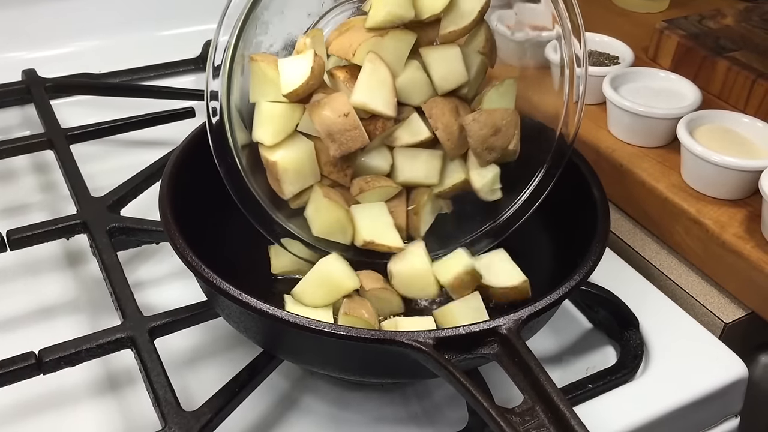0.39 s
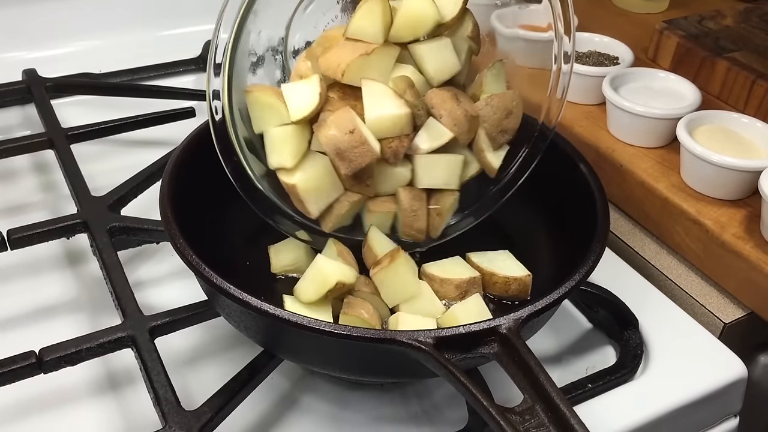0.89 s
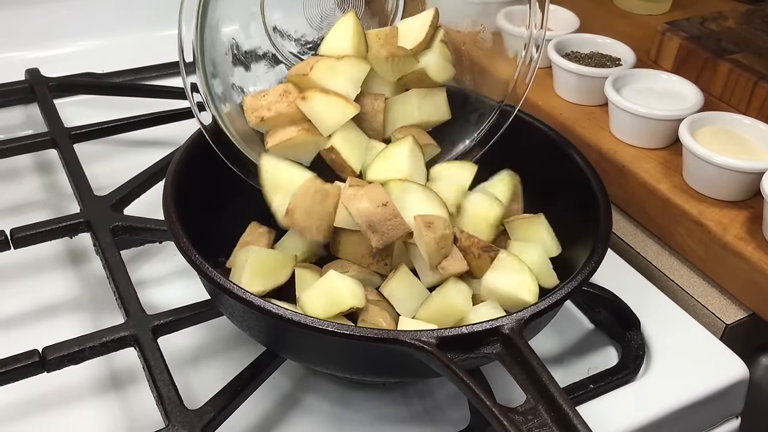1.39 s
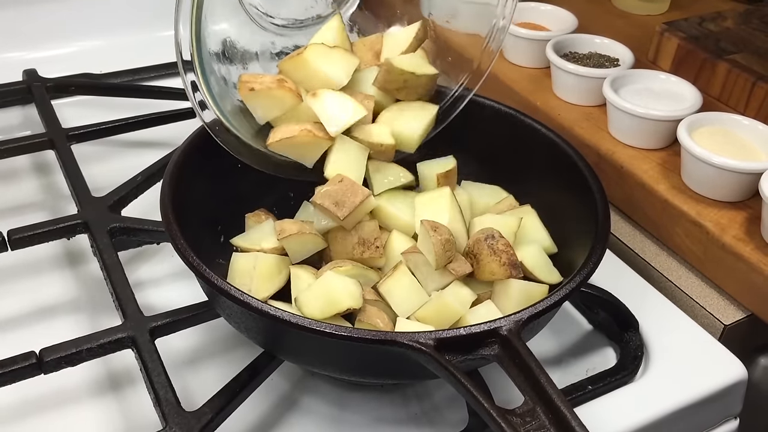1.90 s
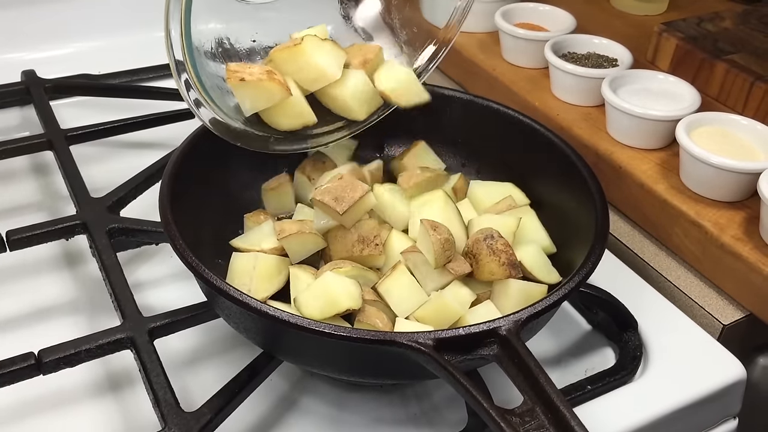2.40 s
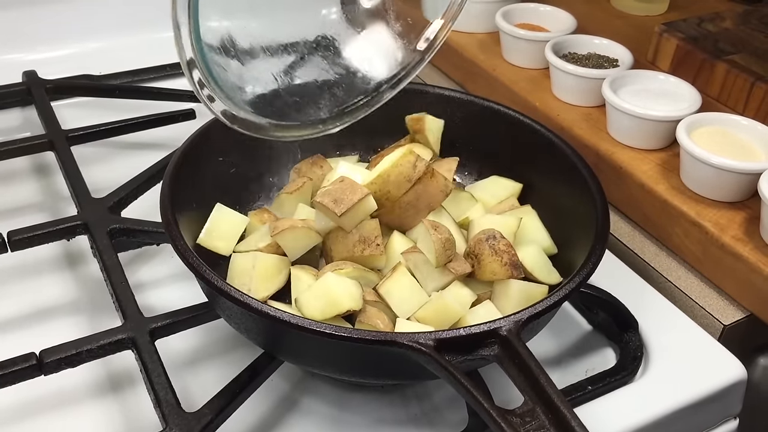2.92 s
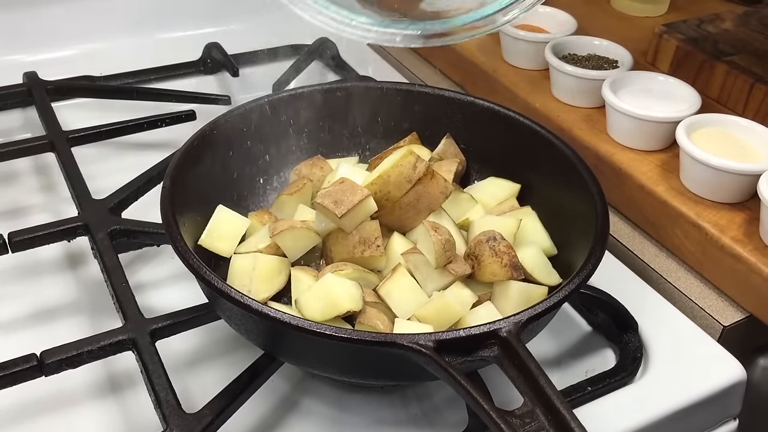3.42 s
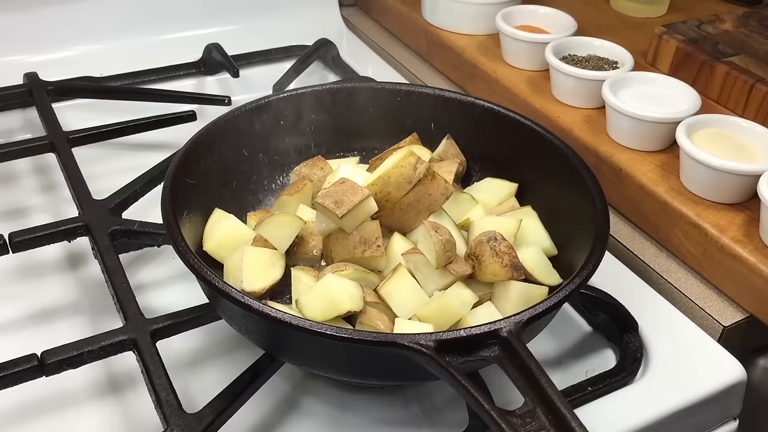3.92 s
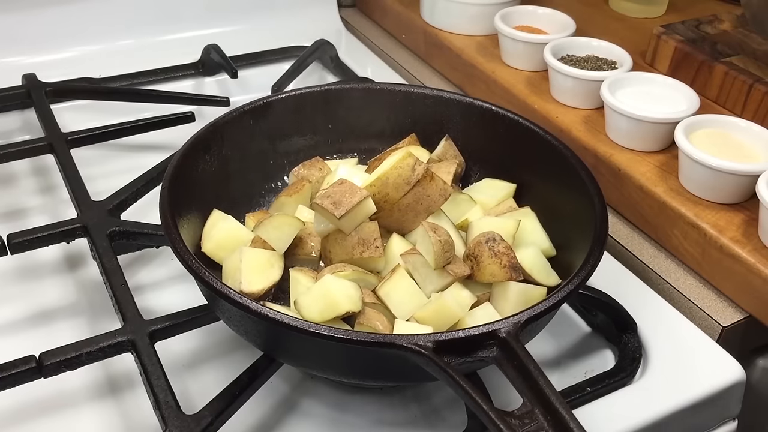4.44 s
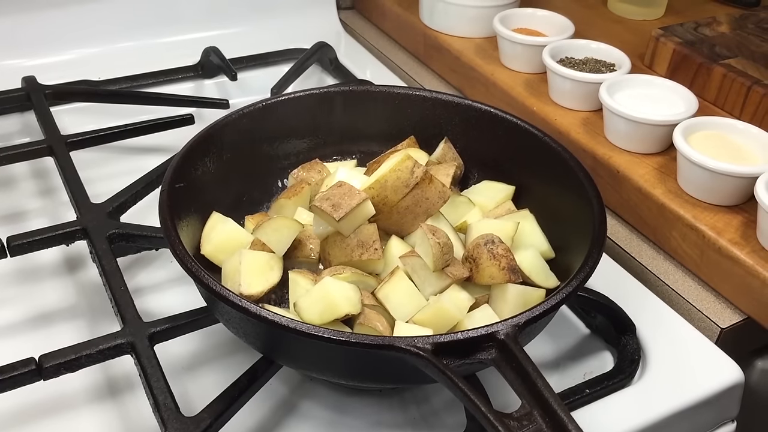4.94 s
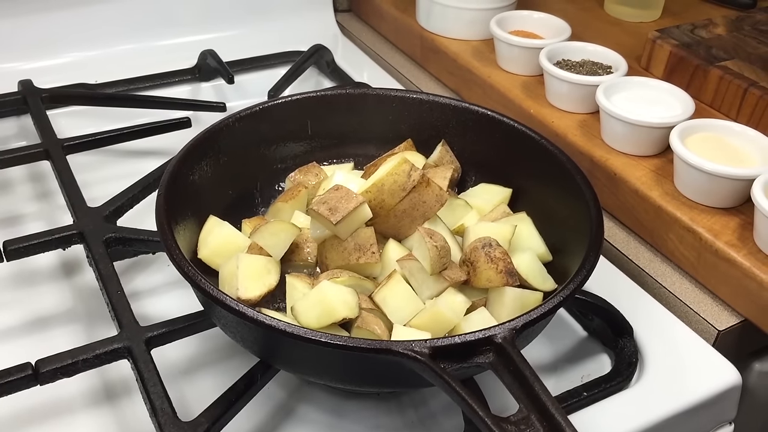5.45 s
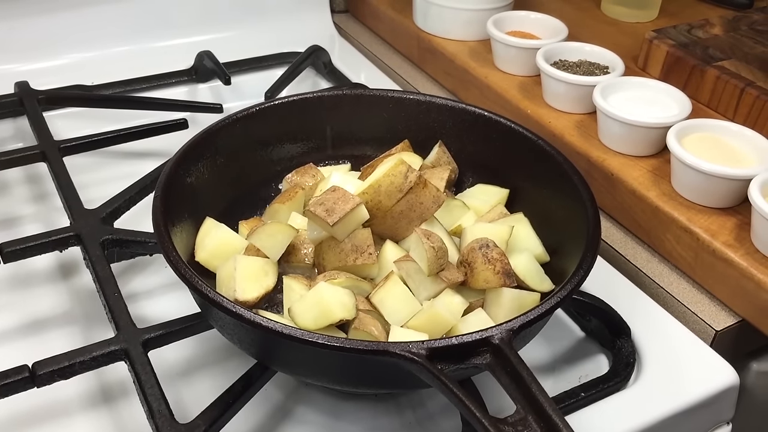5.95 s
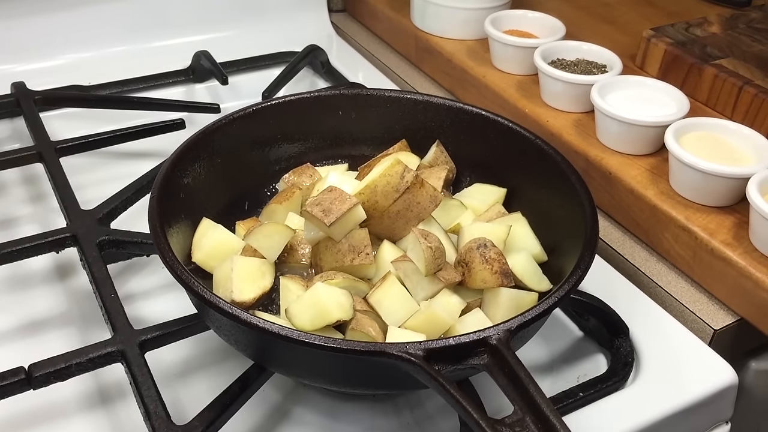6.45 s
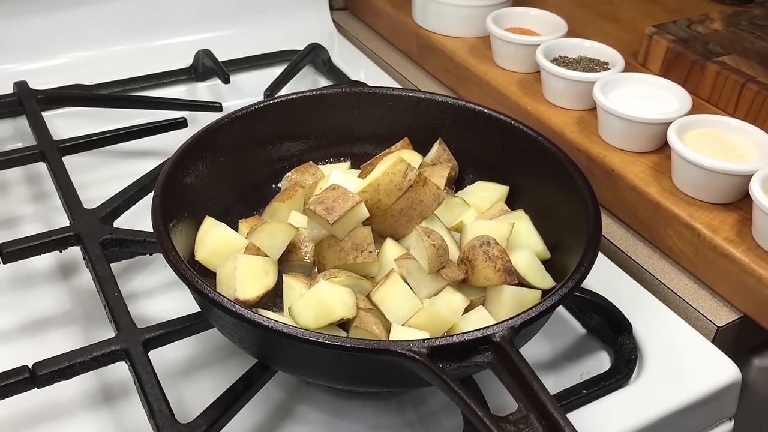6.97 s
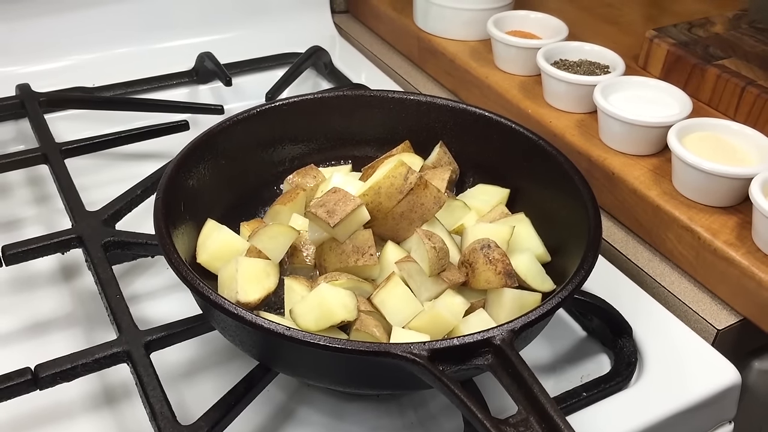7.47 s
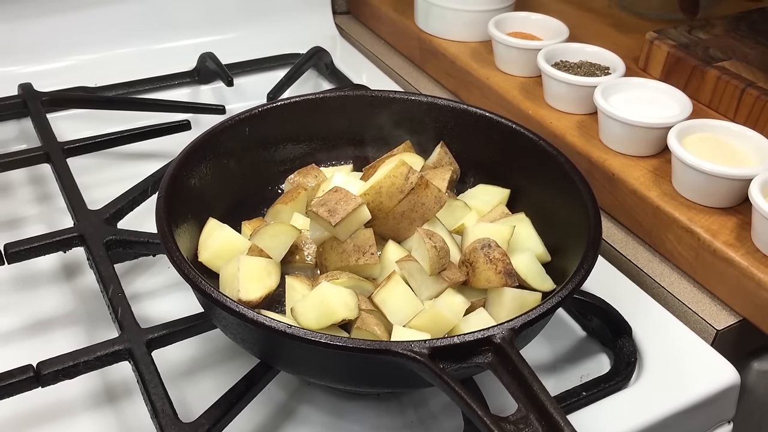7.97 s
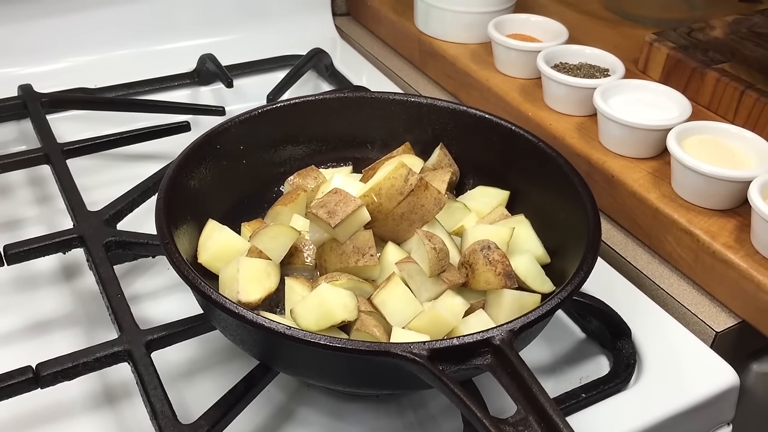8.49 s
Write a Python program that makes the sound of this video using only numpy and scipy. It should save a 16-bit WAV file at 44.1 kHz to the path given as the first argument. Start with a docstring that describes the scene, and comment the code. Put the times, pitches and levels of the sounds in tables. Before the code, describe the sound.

Potato cubes drop from a bowl into hot oil in a cast iron pan. For the first second there are sparse, ringing spits and short hisses, then a sudden rush of bright sizzling that thickens into continuous frying. Loud pops stand out now and then. Low kitchen rumble and a few dull knocks, strongest near the end, lie below. Close, nearly mono microphone, little room.

```python
"""A kitchen: moist potato cubes are tipped from a glass bowl into hot oil in a cast iron pan on a gas stove.
Steam bubbles of many sizes burst in the oil, first in spurts, then without pause: short rings plus hiss.
Loud spits crack, and the bare pan rings (resonant filters) until the cubes cover it.
Dull knocks and thuds (struck resonances) and a kitchen rumble (filtered noise) lie below;
one microphone with a peak limiter."""
import sys
import numpy as np
from scipy import signal
from scipy.fft import rfft, irfft
from scipy.io import wavfile
from scipy.ndimage import uniform_filter1d, minimum_filter1d

SR = 44100
rng = np.random.default_rng(int(sys.argv[2]) if len(sys.argv) > 2 else 0)


def wrap_up_sound(samples):
    """Save the sound to the file named by the first command line argument, as 16-bit audio."""
    columns = np.atleast_2d(samples).T
    # keep every value between -1 and 1, then stretch to whole-number steps
    tamed = np.clip(columns, -1, 1)
    steps = np.round(tamed * 32767).astype(np.int16)
    wavfile.write(sys.argv[1], SR, steps)


def makeup_ratio(level_db):
    """Linear amplitude ratio for a level in decibels (20 dB per factor of ten)."""
    decades = np.asarray(level_db, float) / 20
    return 10 ** decades


N = 379701  # length in samples

# The tone colour of bursting steam. Each row: frequency in Hz, level in dB per Hz.
SIZZLE_COLOUR = [(210, -36), (350, -20), (397, -25.5), (723, -19), (1100, -10.5), (1300, -6), (2020, -6),
                 (2810, 0.5), (4730, -2), (6690, -0.5), (10600, -6), (14500, -9), (15200, -6)]
# How full the pan is. Each row: time in seconds, filling (0 almost empty, 1 half full, 2 full).
PAN_FILLING = [(0, 0), (1.1, .1), (1.5, 1), (2.6, 1.1), (3.6, 1.8), (5, 2), (8.61, 2)]


def sizzle():
    """Steam bubbles burst: all sizes swell together in spurts, and each has spurts and a flicker of its own."""
    # Bubble sizes, finest first. Each row: lowest pitch in Hz, highest pitch in Hz, full rate in bursts per
    # second, cycles rung until 60 dB down, size spread in dB.
    bubble_sizes = [(9000, 14400, 6500, 25, 3.5), (4540, 9170, 4000, 6.4, 3), (2076, 4670, 2500, 8.4, 3.5),
                    (450, 2130, 1200, 10.5, 2.5)]
    # Steady frying. Each row: time in seconds, vigour in dB.
    vigour_rows = [(0, -35.5), (.47, -72), (.56, -24), (1.0, -27), (1.04, -33.5), (1.19, -31), (1.3, -14.5),
                   (1.48, -17), (1.55, -14.5), (2.0, -13.5), (2.04, -18.5), (2.07, -15), (3.2, -11),
                   (8.61, -12)]
    # Share of each bubble size, finest first. Each row: share in dB when almost empty, half full and full,
    # then the change in dB per second as the cubes dry.
    size_shares = [(-3.5, -7, -8.5, -1), (-1, -5, -8.5, -0.01), (-9, -6.5, -5.5, 0.83),
                   (-13.5, -7, -8.5, -0.26)]
    # Share of the full burst rate: almost empty, half full, full.
    crowd_shares = [0.6, .8, 0.92]
    # Snaps against the second finest bubbles in dB: almost empty, half full, full.
    snap_levels = [-9, -3, -2]
    drying_from_s = 3.46
    vigour_db = in_time(vigour_rows)[0]
    drying_s = np.maximum(np.arange(N) / SR - drying_from_s, 0)
    # few cubes: sparser, coarser bursts
    crowd = np.clip(by_filling(crowd_shares), .05, 1)
    shared_db = .5 * drift(29) + 1.48 * spurts(60, 0.0062)
    oil, gains = np.zeros(N), []
    for (*share_db, dry_db), size in zip(size_shares, bubble_sizes):
        steady = makeup_ratio(vigour_db + by_filling(share_db) + dry_db * drying_s)
        middle_hz = np.sqrt(size[0] * size[1])
        gain = np.sqrt(steady ** 2 + flares(middle_hz))
        gains.append(gain)
        own_db = 1.21 * drift(25.6) + 2.0 * spurts(42, 0.00073)
        swarm = makeup_ratio(2.5 * drift(40))
        oil += gain * makeup_ratio(shared_db + own_db) * bubbles(*size, swarm, crowd)
    return oil + gains[1] * makeup_ratio(by_filling(snap_levels)) * snaps(per_s=250, spread_db=4.0)


def bubbles(low_hz, high_hz, per_s, cycles, spread_db, swarm, crowd, count=8):
    """Random bursts, each ringing a few cycles at a pitch drawn at random within this size's range; they come
    in swarms."""
    sizes = makeup_ratio(spread_db * np.minimum(rng.exponential(1, N), 6.0)) * rng.choice([-1, 1], N)
    born = rng.random(N) < per_s * swarm * crowd / SR
    dealt = rng.integers(0, count, N)  # which pitch each burst gets
    edges = np.geomspace(low_hz, high_hz, count + 1)
    rings = np.zeros(N)
    for k, hz in enumerate(np.sqrt(edges[1:] * edges[:-1])):
        weight = hz / np.sin(2 * np.pi * hz / SR)
        rings += weight * ring(sizes * born * (dealt == k), hz, cycles / hz)
    # bursts too small and many to tell apart
    hiss = rms_one(band(rng.standard_normal(N), low_hz, high_hz))
    mix = rms_one(rings / np.sqrt(crowd)) + 0.68 * np.sqrt(crowd) * hiss
    return rms_one(colour(mix, SIZZLE_COLOUR))


def flares(hz):
    """Wet faces meet the oil: power given to bubbles of one pitch rises quickly, then dies away."""
    # Each row: start in seconds, level in dB, dying time in seconds, pitch of the main bubbles in Hz.
    flare_rows = [(0, -34.5, .15, 2200), (.15, -32, 0.83, 10100), (.18, -22, 0.025, 9500),
                  (.197, -18, 0.034, 6000), (.488, -19.5, .04, 9600), (.525, -22.5, 0.062, 5560),
                  (.572, -18, 0.04, 3300), (.645, -17, 0.1, 3600), (.695, -25, 0.021, 7000),
                  (.775, -27, 0.036, 9000), (.895, -16.5, 0.056, 2210), (.945, -11.5, 0.016, 5000),
                  (1.005, -23, .02, 1300), (1.058, -20.5, 0.12, 2620), (1.145, -24, 0.036, 7040),
                  (1.21, -17, .06, 2760), (1.645, -10, 0.038, 6050), (2.055, -7.5, 0.035, 1800),
                  (2.395, -4.5, 0.035, 2180), (2.46, -17, 0.055, 9000)]
    rise_s, fall_db_per_octave = 0.0054, 7.5
    power = np.zeros(N)
    for s, db, dying_s, main_hz in flare_rows:
        at = round(s * SR)
        age = np.arange(min(N - at, round(10 * dying_s * SR))) / SR
        shape = (1 - np.exp(-age / rise_s)) * np.exp(-age / dying_s)
        octaves = abs(np.log2(hz / main_hz))
        power[at:at + len(age)] += (makeup_ratio(db - fall_db_per_octave * octaves) * shape) ** 2
    return power


def snaps(per_s, spread_db):
    """Droplets flash to steam: a needle click with a wisp of hiss behind it."""
    sizes = makeup_ratio(spread_db * np.minimum(rng.exponential(1, N), 4.0)) * (rng.random(N) < per_s / SR)
    fading = signal.lfilter([1], [1, -np.exp(-1 / (.002 * SR))], sizes)  # over 2 ms
    wisps = .25 * rng.standard_normal(N) * fading
    clicks = sizes * rng.choice([-1, 1], N)
    return rms_one(colour(band(clicks + wisps, 3550, 14000), SIZZLE_COLOUR))


def spits():
    """A big drop of water explodes: a crack and a short ring."""
    # Loud spits of oil. Each row: start in seconds, level in dB, pitch in Hz.
    spit_rows = [(0.067, -10, 7100), (0.1844, -6, 9960), (0.1975, -20, 5000), (0.2079, 1, 6840),
                 (0.498, -0.5, 9550), (0.552, -3, 5960), (0.576, -2, 4500), (0.6633, -4, 7000),
                 (0.698, -2, 7600), (0.7875, -4, 9360), (0.8129, -2, 13000), (0.8334, -7, 4150),
                 (0.9163, -10, 2120), (0.9555, -4, 3900), (0.9935, -8, 11400), (1.0606, -2.5, 4480),
                 (1.1012, -6, 11500), (1.1017, -5.5, 3000), (1.158, -6, 11000), (1.4, 7, 4070),
                 (1.654, -1, 5590), (1.927, -2, 2320), (2.052, -1, 1930), (2.137, 1, 2160),
                 (2.1705, 8, 2090), (2.2727, -4, 3520), (2.403, 7, 2760), (2.4457, 0, 2410),
                 (2.9438, 10, 2350), (3.8702, 7, 3260), (4.2159, -3, 3500), (4.6804, -10, 2740),
                 (6.0707, 7, 2850), (7.5884, 7, 2740)]
    out, t = np.zeros(N), np.arange(600) / SR
    for s, level_db, hz in spit_rows:
        at = round(s * SR)
        crack = .5 * rng.standard_normal(len(t)) * np.exp(-t / 0.00023)
        tone = np.sin(2 * np.pi * hz * t) * np.exp(-t * hz / 4.1)  # dies over about four cycles
        out[at:at + len(t)] += makeup_ratio(level_db) * (tone + crack)
    return band(out, 2300, 22000)


def kitchen(x):
    """A close echo from the stove top."""
    # Each row: delay in seconds, level in dB.
    echo_rows = [(.0031, -6.5)]
    lags = np.zeros(round(.04 * SR))
    lags[0] = 1  # the direct sound
    for delay_s, db in echo_rows:
        lags[round(delay_s * SR)] = makeup_ratio(db)
    return signal.fftconvolve(x, lags)[:N]


def pan(x):
    """The iron and the air in it ring along; which modes stand out changes as the cubes pile up."""
    # Resonances of the pan. Each row: pitch in Hz, width in Hz, then the rise in dB when almost empty,
    # half full and under the whole pile.
    pan_modes = [(730, 30, 3, 4, 5), (945, 20, 4, 11, 1), (1300, 70, 9, 5, 4), (1640, 130, 10, 2, 0),
                 (1890, 40, 5, 4, 1), (2130, 70, 8, 7, 0), (2760, 90, 5, 2, 2.5), (3130, 90, 6, 2, 1),
                 (3470, 100, 2, 0, 1), (4200, 200, 6, 1, 1)]
    # Level in dB that leaves the pan: almost empty, half full, full.
    leaving_levels = [-1.5, -0.32, -0.28]
    waver_db = 3.0  # each resonance swells and fades as cubes shift
    rings = np.zeros(N)
    for hz, width_hz, *rise_db in pan_modes:
        mode = signal.lfilter(*signal.iirpeak(hz, hz / width_hz, fs=SR), x)
        rings += (makeup_ratio(by_filling(rise_db)) - 1) * makeup_ratio(waver_db * drift(4)) * mode
    return makeup_ratio(by_filling(leaving_levels)) * (x + rings)


def knocks():
    """Soft blows on stove and worktop; hard ones reach the upper modes, and the room rumbles on."""
    # Each row: start in seconds, strength in dB, hardness in dB, rumbling tail against the strength in dB.
    knock_rows = [(0.002, -24, -15, -15), (0.353, -21, -25, -13.5), (4.502, -23, 15, -22),
                  (4.516, -24, 17.5, -23), (4.563, -30, 14, -25), (6.789, -17, 5, -24),
                  (7.754, -26, -10, -30), (7.939, -21, -15, -24), (8.105, -10.5, 13, -20),
                  (8.21, -6.5, -8, -33), (8.343, -15, 6.5, -33)]
    # Modes of stove and worktop. Each row: pitch in Hz, relative level in dB, time to fall 60 dB in seconds.
    counter_modes = [(111.6, -0.5, 0.19), (248, -6, 0.034), (281, 4.5, .12), (576, -8.5, 0.079),
                     (740, -8, 0.082), (852, 14.5, 0.054)]
    tail_t60_s = .8
    rattle_db, rattle_t60_s = -23.5, 0.35  # loose things buzz after a hard blow
    s, strength_db, hard_db, tail_db = np.transpose(knock_rows)
    at, out = np.round(s * SR).astype(int), np.zeros(N)
    for hz, db, t60_s in counter_modes:
        clicks = np.zeros(N)
        clicks[at] = makeup_ratio(strength_db + db - 11.5 + hard_db * (hz > 400))
        soft_blows = signal.lfilter([.0049], np.convolve([1, -.93], [1, -.93]), clicks)
        out += ring(soft_blows, hz, t60_s)
    blows = np.zeros(N)
    blows[at] = makeup_ratio(strength_db + tail_db)
    tail = signal.lfilter([1], [1, -makeup_ratio(-60 / (tail_t60_s * SR))], blows)
    blows[at] = makeup_ratio(strength_db + hard_db + rattle_db)
    rattle = signal.lfilter([1], [1, -makeup_ratio(-60 / (rattle_t60_s * SR))], blows)
    low_noise = rms_one(band(band(rng.standard_normal(N), 70, 400), 70, 400))
    high_noise = rms_one(band(band(rng.standard_normal(N), 400, 950), 400, 950))
    return band(band(out, 73, 2000), 73, 2000) + tail * low_noise + rattle * high_noise


def thuds():
    """Soft low thuds through floor and stove: a rounded push sets the floor swinging for some cycles."""
    # Each row: start in seconds, strength of the push in dB.
    thud_rows = [(1.319, -36), (1.675, -36), (2.019, -36), (2.479, -36), (3.039, -34), (3.239, -31),
                 (5.052, -34), (6.66, -30), (7.029, -34)]
    s, strength_db = np.transpose(thud_rows)
    pushes = np.zeros(N)
    pushes[np.round(s * SR).astype(int)] = makeup_ratio(strength_db)
    return ring(band(pushes, 40, 150), hz=75, t60=0.21)


def rumble():
    """Low noise of the kitchen, and the thrum of the boil carried by pan and grate."""
    # Tone colour of the low noise. Each row: frequency in Hz, level in dB per Hz.
    rumble_colour = [(25, -34), (43, 4), (75, -6), (102, 4), (172, -6.5), (281, 7.5), (387, -10.5),
                     (600, -54)]
    # Boil in the iron. Each row: time in seconds, level in dB.
    thrum_rows = [(1.1, -59), (1.5, -46.5), (2.6, -40.5), (3.1, -38), (5.5, -43), (8.61, -40.5)]
    room_db = -49.5
    room = rms_one(band(colour(rng.standard_normal(N), rumble_colour), 43, 153))
    iron = rms_one(band(colour(rng.standard_normal(N), rumble_colour), 137, 404))
    # faint bumps shake floor and grate together
    bumps_db = 2.9 * spurts(8, 0.038)
    room *= makeup_ratio(room_db + bumps_db + 1.5 * drift(6))
    iron *= makeup_ratio(in_time(thrum_rows)[0] + bumps_db + 1.4 * drift(9))
    return room + iron


def air():
    """Faint room noise above the rumble: a steady band of noise."""
    return makeup_ratio(-54) * rms_one(band(rng.standard_normal(N), 400, 930))


def side_noise():
    """A trace of low noise, with opposite sign on the left and right."""
    return makeup_ratio(-54.5) * rms_one(band(rng.standard_normal(N), 140, 760)) * [[1], [-1]]


def spurts(per_s, decay_s):
    """Sudden outbreaks, as of pockets of steam: each starts at once and dies away."""
    starts = (rng.random(N) < per_s / SR) * rng.exponential(1, N)
    return signal.lfilter([1], [1, -np.exp(-1 / (decay_s * SR))], starts)


def drift(rate_hz):
    """Slow chance of spread 1: smoothed noise, made at every 20th sample."""
    r = np.exp(-40 * np.pi * rate_hz / SR)
    noise = rng.standard_normal(N // 20 + 2002)
    slow = signal.lfilter([1], [1, -2 * r, r * r], noise)[2000:]  # skip the settling
    return np.interp(np.arange(N) / 20, np.arange(len(slow)), rms_one(slow))


def ring(clicks, hz, t60):
    """A unit click sets a sine of height 1 ringing; it falls 60 dB in t60 seconds."""
    r, w = makeup_ratio(-60 / (t60 * SR)), 2 * np.pi * hz / SR
    return signal.lfilter([0, np.sin(w)], [1, -2 * r * np.cos(w), r * r], clicks + 1e-18)


def colour(x, spectrum):
    """Causal filter with the given spectrum: minimum phase by folding the cepstrum."""
    size = 8192
    hz, db = np.transpose(spectrum)
    bins_hz = np.arange(size // 2 + 1) * SR / size
    curve_db = np.interp(np.log(bins_hz + 1), np.log(hz), db)
    cepstrum = irfft(np.log(makeup_ratio(curve_db)))
    cepstrum[1:size // 2] *= 2
    cepstrum[size // 2 + 1:] = 0
    return signal.fftconvolve(x, irfft(np.exp(rfft(cepstrum))))[:N]


def band(x, low_hz, high_hz):
    """Band-pass: keeps what lies between two frequencies."""
    return signal.sosfilt(signal.butter(2, [low_hz, high_hz], "band", fs=SR, output="sos"), x)


def rms_one(x):
    """Scale to rms 1."""
    return x / np.sqrt(np.mean(x ** 2) + 1e-20)


def in_time(rows):
    """Columns of a table as curves over all samples."""
    s, *columns = np.transpose(rows)
    return [np.interp(np.arange(N) / SR, s, c) for c in columns]


def by_filling(values):
    """Curve over time through the values for an almost empty, half full and full pan."""
    return np.interp(in_time(PAN_FILLING)[0], range(3), values)


def scene():
    """Everything reaches one microphone; only a trace of low noise differs between the sides."""
    oil = sizzle() + kitchen(spits())
    return pan(oil) + knocks() + thuds() + rumble() + air() + side_noise()


def limiter(x):
    """Ducks just ahead of each peak and recovers at a steady rate."""
    ceiling, release_db_per_s = .975, 800
    over_db = np.maximum(20 * np.log10(np.abs(x).max(axis=0) / ceiling + 1e-9), 0)
    ramp = release_db_per_s * np.arange(N) / SR
    held_db = np.maximum.accumulate(over_db + ramp) - ramp
    ahead_db = -minimum_filter1d(-held_db, size=33)  # in samples
    return x * makeup_ratio(-uniform_filter1d(ahead_db, size=33))


def top_cut(x):
    """Nothing passes above the cut-off."""
    return signal.sosfilt(signal.butter(12, 16440, fs=SR, output="sos"), x)


def record(dry):
    """A dip in the microphone's treble, a bass cut, a top cut, then the peak limiter."""
    notch_hz, notch_width_hz, notch_share = 10500, 600, .55
    notch = signal.lfilter(*signal.iirpeak(notch_hz, notch_hz / notch_width_hz, fs=SR), dry)
    x = dry - notch_share * notch
    x = signal.sosfilt(signal.butter(4, 36, "high", fs=SR, output="sos"), x)
    x = signal.sosfilt(signal.ellip(12, .5, 65, 15350, fs=SR, output="sos"), x)  # top cut in Hz
    return top_cut(limiter(x))


dry = scene()
out = record(dry)
wrap_up_sound(out)
```